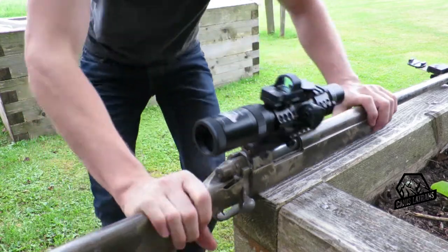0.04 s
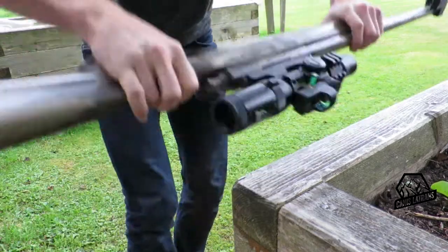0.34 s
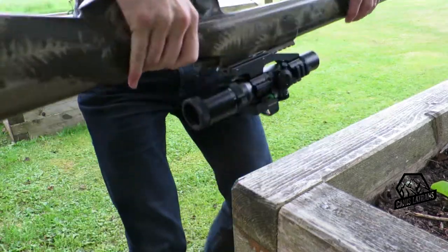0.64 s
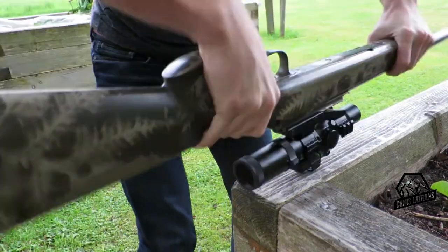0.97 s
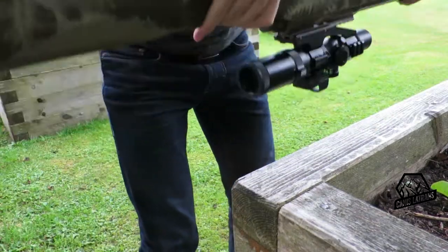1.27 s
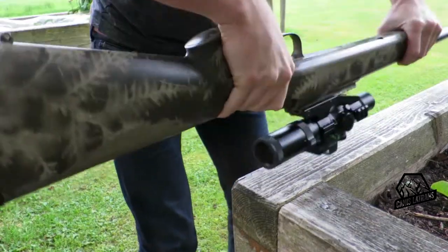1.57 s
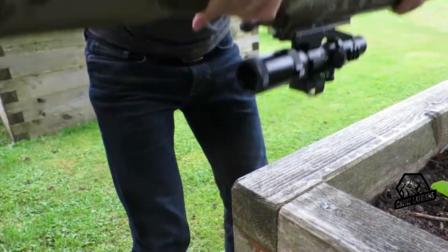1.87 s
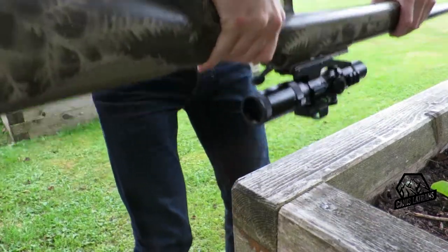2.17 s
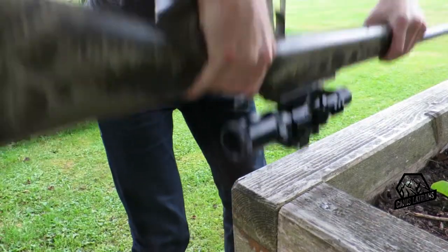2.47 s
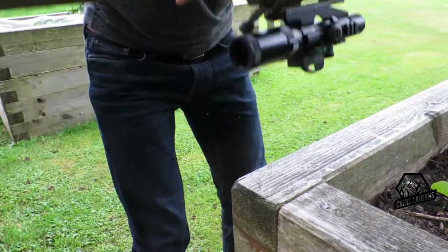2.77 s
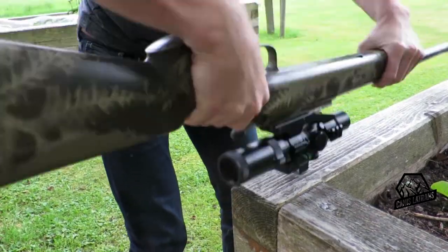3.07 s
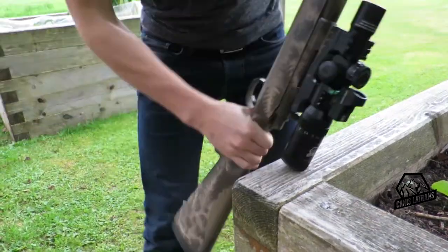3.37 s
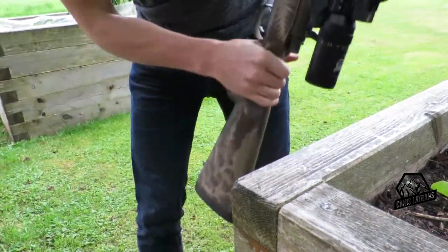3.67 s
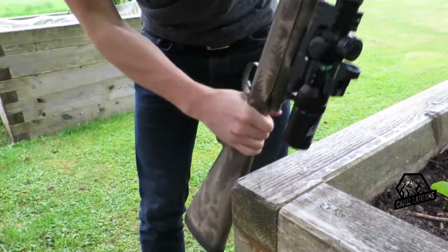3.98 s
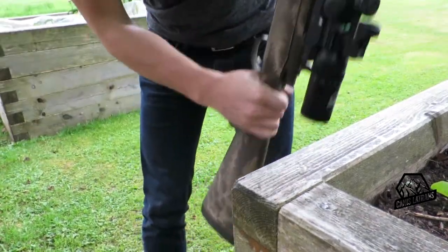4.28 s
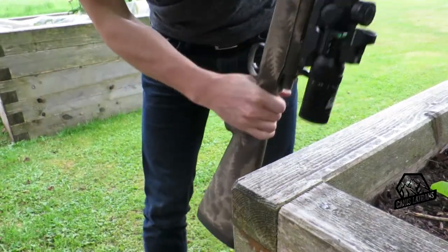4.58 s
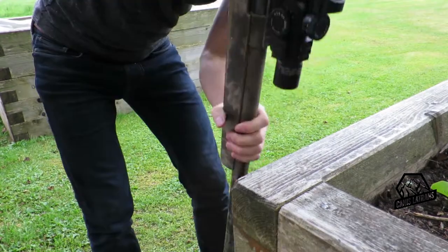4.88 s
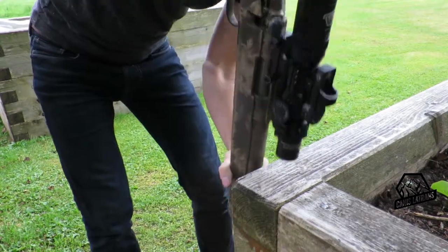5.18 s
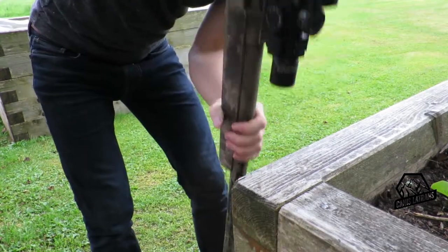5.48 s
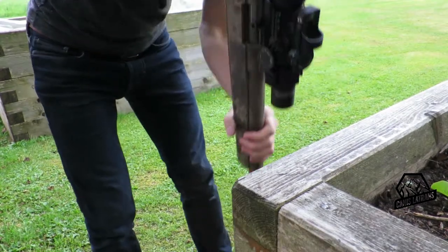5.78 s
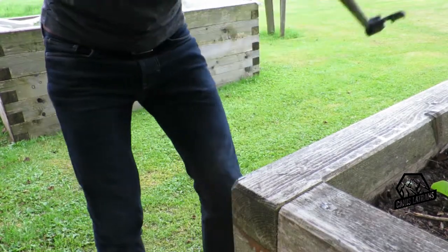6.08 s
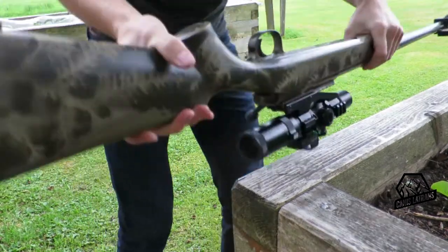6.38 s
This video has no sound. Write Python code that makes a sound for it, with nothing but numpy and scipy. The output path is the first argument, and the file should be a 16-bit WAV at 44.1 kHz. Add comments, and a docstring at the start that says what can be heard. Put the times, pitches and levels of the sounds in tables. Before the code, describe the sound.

Ten sharp thunks of a rifle banged on timber, about half a second apart, with metal clanks and a loose bolt rattling, outdoors.

```python
"""Rifle struck on timber

A rifle is banged on the timber edge of a garden bed, five times scope first, then five with its stock.
Each impact cracks, excites the rifle's bending modes and, as it bottoms out, thumps the timber.
The action buzzes after the scope blows, and the loose bolt clacks on the lift.
Clothes rustle and light air rumbles around a close stereo microphone."""
import sys
import numpy as np
from scipy import signal
from scipy.fft import rfft, irfft, next_fast_len
from scipy.io import wavfile
from scipy.ndimage import map_coordinates

SR = 44100
rng = np.random.default_rng(int(sys.argv[2]) if len(sys.argv) > 2 else 0)


def dump(signal):
    """Clip the signal to [-1, 1] and save it as 16-bit WAV at the path in sys.argv[1]."""
    limited = np.clip(np.atleast_2d(signal).T, -1, 1)
    pcm = np.round(limited * 32767).astype(np.int16)
    wavfile.write(sys.argv[1], SR, pcm)


N = 284120
T = np.arange(SR // 3) / SR  # time axis of one event, s

# Scope blows: start_s, strength_db, hardness_db_per_octave, clank_db, tink_db, rebound_s, buzz_db
SCOPE_BLOWS = [(1.1100, -2.86, 1.5, -0.5, -19.5, .011, -43.5), (1.5929, -2.5, 0, -4.5, -25, .018, -34),
               (2.1092, -1.6, -2, -4, -21.5, .014, -34), (2.642, -1.5, -.5, -2.5, -41, 0.018, -31.5),
               (3.1928, -2, -0.5, -1, -24.5, .012, -35)]
# Stock blows: start_s, ring_db, hardness_db_per_octave, timber_db, clank_db, crack_db, tink_db,
# rebound_s, rebound_db
STOCK_BLOWS = [(3.4830, 0.5, 2, -6, -1, -16.5, -24.5, .018, -27.5),
               (3.9728, -7, 1, -.5, -5, -28.5, -23, 0.015, -21.5),
               (4.4753, -0.5, 1.5, 0, -3.5, -19.5, -20.5, .016, -20.5),
               (5.215, -4.5, -2.5, -7.5, -12, -19, -14.5, 0.0053, -56),
               (5.7224, -5.5, -2, -1.5, -22, -24, -21, 0.01, -32)]
# Modes of the rifle, struck on scope or stock, and of the timber: pitch_hz, level_db, t60_s
SCOPE_MODES = [(178.7, -8, 0.088), (299.8, -20, 0.03), (365.8, -20, 0.087), (613, -12, 0.022),
               (754, -39, 0.086), (1350, -34, .07)]
STOCK_MODES = [(148.4, -6, 0.033), (274, -24.5, 0.049), (358, -14, 0.06), (423, -13.5, .04),
               (571, -19, 0.025), (747, -31, 0.049)]
TIMBER_MODES = [(155.5, -5, 0.047), (114.8, -33, 0.24)]
# Resonances of the steel action: pitch_hz, bandwidth_hz, level_db
STEEL_MODES = [(404, 150, -1), (560, 220, 3.5), (820, 180, 0), (1150, 180, 1), (1416, 34, -4),
               (2460, 690, -19), (3400, 3000, -15)]
# Single contacts of bolt and fittings: start_s, level_db, relative_tick_db, centre_hz
CLACKS = [(.174, -26.5, -34, 1800), (.421, -44, 7, 1500), (1.548, -15, -31, 1855),
          (2.068, -18, -35.5, 1860), (2.632, -12, -29, 1600), (2.708, -7.5, -18, 1490),
          (3.622, -36, -15.5, 1210), (4.658, -30.5, -23, 1420), (5.031, -53.5, 8.5, 1480),
          (5.773, -26.5, -37, 1250), (6.11, -35.5, -28, 2000)]
# Bolt rattles, with the losses reached as the bolt falls back:
# start_s, fall_back_s, level_db, relative_tick_db, centre_hz, level_loss_db, tick_loss_db
RATTLES = [(0.767, 0.8106, -4.5, -13.5, 780, 4, 15.5), (1.274, 1.32, -10, -14, 1490, 9.5, 1.5),
           (1.775, 1.808, -14.5, -14.5, 1190, 4.5, 3.5), (2.288, 2.327, -19.5, -15, 1260, 4, 2),
           (2.812, 2.858, -16, -11.5, 1320, -2, 23), (3.346, 3.358, -18, -16.5, 1470, 6, 4)]
# The bolt strikes, chatters, grazes, falls back and settles: fraction_of_fall_time, level_db
RATTLE_CONTACTS = [(0, 0), (.14, -4), (.7, -8), (1, 0), (1.56, -7)]
# Shifts of the grip: centre_s, level_db, pitch_hz
GRIP_BUMPS = [(0.65, -34.5, 78), (0.869, -28, 96), (0.895, -28.5, 111), (.928, -26, 98), (0.94, -25, 117),
              (1.422, -41, 112), (2.436, -41, 138), (2.488, -39.5, 161), (3.9, -41.5, 123)]
# Sleeves and jeans brushing past: centre_s, level_db, width_s
SWISHES = [(.075, -70.5, 0.11), (.505, -54, 0.042), (3.414, -63.5, 0.057), (6.31, -70, 0.021)]
# Spectral shapes of the noises: frequency_hz, relative_density_db
CRACK_SPECTRUM = [(100, -16), (500, 5), (1350, 1), (2200, -4), (4000, -4), (7000, -3.5), (9500, -0.5),
                  (12500, 0.5), (14500, 3.5), (16000, -11)]
TINK_SPECTRUM = [(9000, -38.5), (11300, -18.5), (11900, -0.5), (12600, 2), (13100, -4), (13800, -12),
                 (15000, -27)]
TICK_SPECTRUM = [(300, -15.5), (1500, 2), (4000, -10.5), (8000, -0.5), (12500, 6), (16000, -8)]
BUZZ_SPECTRUM = [(150, 0), (350, 14.5), (600, 14), (1080, 9.5), (1200, 9.5), (1350, 8), (1560, 5.5),
                 (2200, -3), (4000, -6.5), (9000, -6), (12500, -4), (14500, -9), (16000, -14.5)]
CLOTH_SPECTRUM = [(1200, -37.5), (2200, -13), (3200, -9.5), (7800, -8), (10500, -6.5), (12700, -3),
                  (14500, -6), (16000, -13.5)]
WIND_SPECTRUM = [(12, -26), (22, -7.5), (40, -3), (62, 4), (90, -3), (130, -2.5), (200, -8), (300, -15.5),
                 (420, -21), (800, -57)]
GARDEN_SPECTRUM = [(120, -20.5), (200, -3.5), (320, -4), (520, -4), (1140, -12), (1700, -18), (2300, -24.5),
                   (4000, -35.5), (8000, -62)]
# Background contour, taken relative to its mean: time_s, level_db
BACKGROUND_CONTOUR = [(0.0, -65.5), (0.66, -62.5), (0.84, -64), (1.15, -66), (1.31, -75), (1.7, -73),
                      (1.83, -76.5), (3.08, -72.5), (3.39, -64.5), (3.62, -79.5), (4.39, -72.5),
                      (4.75, -79), (5.13, -74.5), (5.29, -82), (5.5, -82), (6.44, -71.5)]
# Likeness of left and right in the background: frequency_hz, correlation
AIR_COHERENCE = [(60, 0.96), (180, 0.03), (550, 0.097), (1650, 0.33), (4970, 0.076), (15000, 0.11)]
# Reverberation of the yard: frequency_hz, t60_s
YARD_DECAY = [(150, 0.2), (1000, 0.1), (4000, 0.11), (13000, 0.077)]
# Phase between the microphone ports: frequency_hz, left_lead_rad
PORT_PHASE = [(300, 0.12), (2500, 0.32), (6000, 0.33), (9000, -1.3), (12500, -1.1), (16000, -0.77)]

SCOPE_TIMBER_DB, SCOPE_CRACK_DB, SCOPE_REBOUND_DB = 2.5, -16.5, -32  # relative to the blow's strength
STOCK_BUZZ_DB = -47.5  # relative to the clank: held upright, the action hardly buzzes
SCOPE_LAG_S, STOCK_LAG_S = 0.01171, .0136  # from first contact until the timber gives way
SCOPE_LEAD_S = .0011  # the hard scope reaches the metal parts sooner
HOP_FIRST_S, HOP_GAP_S = .020, 0.049
HOP_DB, HOP_LOSS_DB, HOP_TICK_DB, HOP_HZ = -12.5, 7.5, -34.5, 1220
SOFT_TICK_DB, SOFT_CUTOFF_HZ, TICK_DB_PER_OCTAVE = -35, 2800, 10.5  # weaker tick, duller ring
DIP_SCALE_DB, DIP_ONSET_S, DIP_RECOVER_S = 6, 0.092, .3
WIND_DB, GARDEN_DB, CLOTH_DB = -50.5, -60, -67.5  # at the contour's mean
WIND_FOLLOWS, GARDEN_FOLLOWS = 0.82, 0.96  # dB per dB of the contour
BAND_LIMIT_HZ = 16000


def blows():
    """Impact excitation: each blow drives low thunks (mono) and bright metal (stereo)."""
    thunks, metal = np.zeros(N), np.zeros((2, N))
    for start, db, hardness, clank_db, tink_db, rebound_s, buzz_db in SCOPE_BLOWS:
        add(thunks, start, thunk(SCOPE_MODES, db, hardness, db + SCOPE_TIMBER_DB, SCOPE_LAG_S))
        hit = crack(clank_db, db + SCOPE_CRACK_DB, tink_db, rebound_s, db + SCOPE_REBOUND_DB)
        add(metal, start - SCOPE_LEAD_S, at_ports(hit + amp(buzz_db) * buzz()))
    for start, db, hardness, timber_db, clank_db, crack_db, tink_db, rebound_s, back_db in STOCK_BLOWS:
        add(thunks, start, thunk(STOCK_MODES, db, hardness, timber_db, STOCK_LAG_S))
        hit = crack(clank_db, crack_db, tink_db, rebound_s, back_db)
        add(metal, start, at_ports(hit + amp(clank_db + STOCK_BUZZ_DB) * buzz()))
    return cut_deep_bass(thunks), metal


def thunk(modes, ring_db, hardness, timber_db, lag_s):
    """Modal superposition: neighbouring bending modes swing in opposition; the timber yields later."""
    rifle = 0
    for k, (hz, db, t60) in enumerate(modes):
        tilt_db = hardness * np.log2(hz / modes[0][0])
        rifle += (-1) ** k * amp(db + tilt_db - 60 * T / t60) * np.sin(2 * np.pi * hz * T)
    timber = sum(amp(db) * burst(lag_s, 0.00039, t60) * np.sin(2 * np.pi * hz * (T - lag_s))
                 for hz, db, t60 in TIMBER_MODES)
    return amp(ring_db) * rifle - amp(timber_db) * timber


def cut_deep_bass(vibration):
    """High-pass filtering: the thunks carry little deep bass below about 60 Hz."""
    high_passed = signal.sosfilt(signal.butter(2, 60, "high", fs=SR, output="sos"), vibration)
    bass_loss = [(25, -5.0), (50, -9.0), (66, -6.0), (85, -1.0)]  # frequency_hz, gain_db
    return filtered(high_passed, lambda hz: amp(along(bass_loss, hz)))


def crack(clank_db, crack_db, tink_db, rebound_s, rebound_db):
    """Elastic collision: metal parts slam together, meet again on the rebound and settle."""
    contact = swell(0.0028, 0.00095) + amp(-18.5) * burst(0.0075, 0.00077, 0.048)
    slam = amp(crack_db) * puff(CRACK_SPECTRUM, contact)
    clank = amp(clank_db) * steel_ring(.0028, burst(0.0022, 0.0025, 0.027), centre_hz=1300)
    tink = amp(tink_db) * puff(TINK_SPECTRUM, swell(0.0038, 0.00055))
    rebound = amp(rebound_db) * puff(TICK_SPECTRUM, swell(rebound_s + 0.0027, 0.0018))
    settling = amp(-39) * noise(CRACK_SPECTRUM) * burst(0.0033, 0.0017, 0.12)
    return slam + clank + tink + rebound + settling


def steel_ring(start_s, scrape, centre_hz, width_octaves=0.9):
    """Resonance: a tap and its rough aftermath drive the modes near centre_hz, to unit energy."""
    force = scrape * rng.standard_normal(len(T))
    force = 1.2 * force / np.linalg.norm(force)
    force[round(start_s * SR)] += 1
    reach = lambda hz: np.exp(-.5 * (np.log2(hz / centre_hz) / width_octaves) ** 2)
    response = lambda f: sum(amp(db) * reach(hz) * 1j * f * width / (hz * hz - f * f + 1j * f * width)
                             for hz, width, db in STEEL_MODES)
    ring = filtered(force, response)
    return ring / np.linalg.norm(ring)


def buzz():
    """Amplitude modulation: the shaken action chatters in uneven, decaying grains of noise."""
    chatter = unit(amp(3 * wobble(400, size=len(T))))
    return noise(BUZZ_SPECTRUM) * chatter * burst(0.0017, 0.00065, 0.36)


def clacks():
    """Contact stiffness limits bandwidth: loose parts tick, and soft contacts ring only low modes."""
    track = np.zeros((2, N))
    for start, db, tick_db, centre_hz in CLACKS + bolt_rattles() + fitting_hops(count=3):
        contact = burst(0, 0.0021, 0.0097) + amp(-24) * burst(0, 0.0018, 0.11)
        octaves = (tick_db - SOFT_TICK_DB) / TICK_DB_PER_OCTAVE
        low_pass = signal.butter(4, min(SOFT_CUTOFF_HZ * 2 ** octaves, BAND_LIMIT_HZ), fs=SR)
        ring = signal.lfilter(*low_pass, steel_ring(.0005, contact, centre_hz))
        tick = amp(tick_db) * puff(TICK_SPECTRUM, contact)
        add(track, start, at_ports(amp(db) * (ring + tick)))
    return track


def bolt_rattles(sag_octaves=.7):
    """Dissipation: the loose bolt's contacts grow softer and lower as it settles."""
    return [(start + fraction * (fall_back - start),
             db + step_db - loss_db * fraction,
             tick_db - tick_loss_db * fraction,
             hz / 2 ** (sag_octaves * fraction))
            for start, fall_back, db, tick_db, hz, loss_db, tick_loss_db in RATTLES
            for fraction, step_db in RATTLE_CONTACTS]


def fitting_hops(count):
    """Inelastic bouncing: the fittings hop after each scope blow, weaker at every contact."""
    return [(start + HOP_FIRST_S + HOP_GAP_S * k, db + HOP_DB - HOP_LOSS_DB * k, HOP_TICK_DB, HOP_HZ)
            for start, db, *_ in SCOPE_BLOWS for k in range(count)]


def handling(bump_width_s=0.0053):
    """Soft impact and friction: the hands bump dully and cloth swishes."""
    track, middle = np.zeros(N), T[-1] / 2
    for centre, db, hz in GRIP_BUMPS:
        tone = np.cos(2 * np.pi * hz * (T - middle))
        add(track, centre - middle, amp(db) * swell(middle, bump_width_s) * tone)
    for centre, db, width in SWISHES:
        add(track, centre - middle, amp(db) * swell(middle, width) * noise(CLOTH_SPECTRUM))
    return track


def at_ports(sound):
    """Phase difference and diffraction: the microphone's body ripples the treble anew on each call."""
    def response(hz):
        gain, phase = [map_coordinates(rng.standard_normal(64), [hz / 280], mode="wrap")
                       for _ in range(2)]
        ripple = np.clip(hz / 5500, .3, 1) * (.16 * gain + .17j * phase)
        return np.exp(np.outer([1, -1], .5j * along(PORT_PHASE, hz) + ripple))
    return filtered(sound, response)


def yard(sound):
    """Scattering: ground and timber walls return a short tail, partly different in each ear."""
    hz, t, spectra = signal.stft(rng.standard_normal((2, len(T))), SR, nperseg=256)
    decay = amp(-60 * t / along(YARD_DECAY, hz)[:, None])
    build_up = 1 - np.exp(-(T / 0.01) ** 2)
    mid, side = signal.istft(spectra * decay, SR, nperseg=256)[1][:, :len(T)] * build_up
    tail = np.array([mid + amp(-12.5) * side, mid - amp(-11.5) * side])
    return signal.fftconvolve(sound[None], tail / np.linalg.norm(tail[0]), axes=1)[:, :N]


def background():
    """Common modulation: wind, garden murmur and cloth hiss move together and dip after each blow."""
    t = np.arange(N) / SR
    level_db = np.interp(t, *np.transpose(BACKGROUND_CONTOUR))
    level_db -= level_db.mean()
    for start, *_ in SCOPE_BLOWS + STOCK_BLOWS:
        since = np.maximum(t - start, 0)
        onset = 1 - np.exp(-(since / DIP_ONSET_S) ** 2)
        level_db -= DIP_SCALE_DB * onset * np.exp(-since / DIP_RECOVER_S)
    wind = amp(WIND_DB + WIND_FOLLOWS * level_db) * rush(WIND_SPECTRUM, flutter_db=2.5, rate_hz=13)
    garden = amp(GARDEN_DB + GARDEN_FOLLOWS * level_db) * rush(GARDEN_SPECTRUM, flutter_db=2, rate_hz=25)
    cloth = amp(CLOTH_DB + level_db) * rush(CLOTH_SPECTRUM, flutter_db=1.5, rate_hz=170)
    return wind + garden + cloth


def rush(spectrum, flutter_db, rate_hz):
    """Partial coherence: mid and side noise mix into a fluttering stereo field of rms 1."""
    def response(hz):
        angle = np.arccos(np.clip(along(AIR_COHERENCE, hz), -1, 1)) / 2
        return amp(along(spectrum, hz)) * [np.cos(angle), np.sin(angle)]
    mid, side = filtered(rng.standard_normal((2, N)), response)
    flutter = amp(flutter_db * wobble(rate_hz, size=N))
    return unit(np.array([mid + side, mid - side]) * flutter)


def puff(spectrum, envelope):
    """Windowed noise carrying the energy of its envelope."""
    x = noise(spectrum) * envelope
    return x * np.linalg.norm(envelope) / np.linalg.norm(x)


def noise(spectrum):
    """Spectral shaping: one event's length of coloured noise, rms 1."""
    return unit(filtered(rng.standard_normal(len(T)), lambda hz: amp(along(spectrum, hz))))


def wobble(rate_hz, size):
    """Spline interpolation: a smooth curve through random knots."""
    knots = rng.standard_normal(4096)
    return map_coordinates(knots, [np.arange(size) * rate_hz / SR], mode="wrap")


def burst(start_s, rise_s, t60_s):
    """An envelope of exponential rise and decay."""
    since = np.maximum(T - start_s, 0)
    return (1 - np.exp(-since / rise_s)) * amp(-60 * since / t60_s)


def swell(centre_s, width_s):
    """A Gaussian envelope."""
    return np.exp(-.5 * ((T - centre_s) / width_s) ** 2)


def filtered(x, response):
    """Linear filtering: the spectrum of x times a complex frequency response."""
    n = x.shape[-1]
    padded = next_fast_len(n + 8192)
    return irfft(rfft(x, padded) * response(np.fft.rfftfreq(padded, 1 / SR)), padded)[..., :n]


def along(points, hz):
    """Interpolation of (frequency_hz, value) points on a logarithmic axis."""
    frequencies, values = np.transpose(points)
    return np.interp(np.log(hz + 1), np.log(frequencies + 1), values)


def add(track, start_s, sound):
    """Superposition of a sound on the track."""
    i = max(round(start_s * SR), 0)
    track[..., i:i + sound.shape[-1]] += sound[..., :N - i]


def amp(db):
    """Decibels to amplitude ratio."""
    return 10 ** (np.asarray(db) / 20)


def unit(x):
    """Normalisation to rms 1."""
    return x / np.sqrt(np.mean(x ** 2) + 1e-20)


def scene():
    """Superposition of the close rifle's direct sound, the yard's scatter and the background."""
    thunks, metal = blows()
    metal = metal + clacks()
    direct = at_ports(thunks) + metal + handling()
    scatter = yard(amp(-18.0) * metal.mean(axis=0) + amp(-23.5) * thunks)
    balance = amp([[-.15], [.15]])
    return direct * balance + scatter + background()


def record(dry):
    """Band limiting: a steep low-pass removes the highest treble."""
    return filtered(dry, lambda hz: 1 / np.sqrt(1 + (hz / BAND_LIMIT_HZ) ** 120))


dry = scene()
out = record(dry)
dump(out)
```